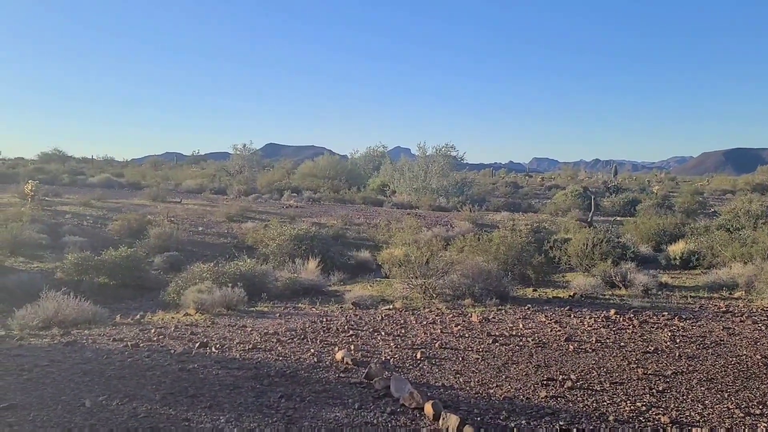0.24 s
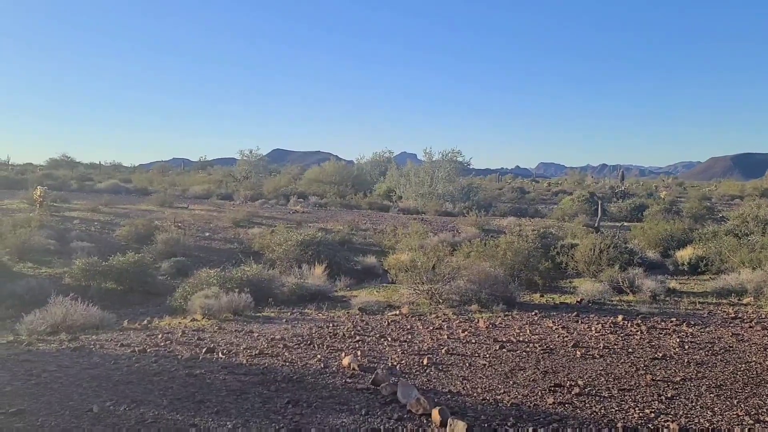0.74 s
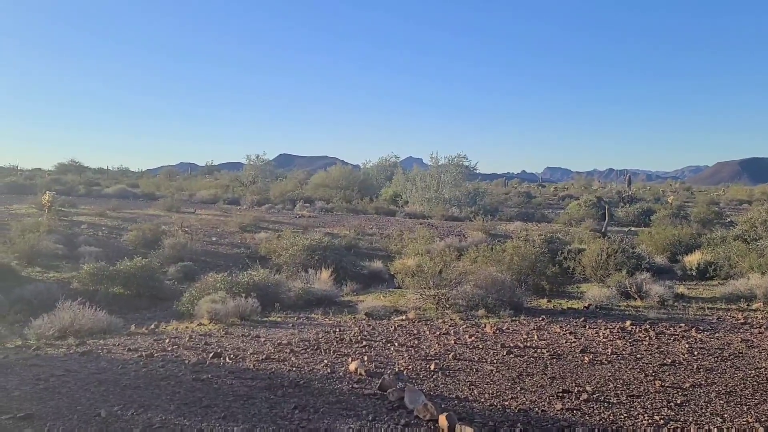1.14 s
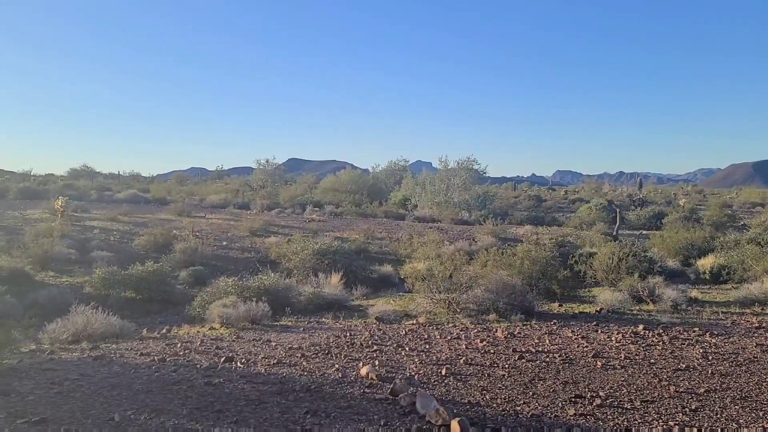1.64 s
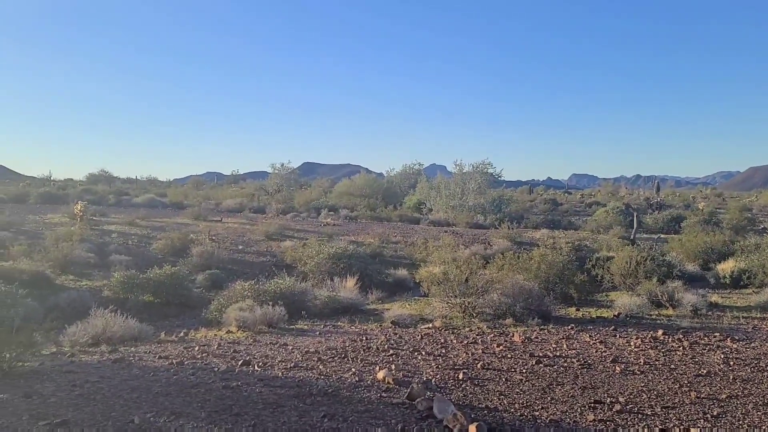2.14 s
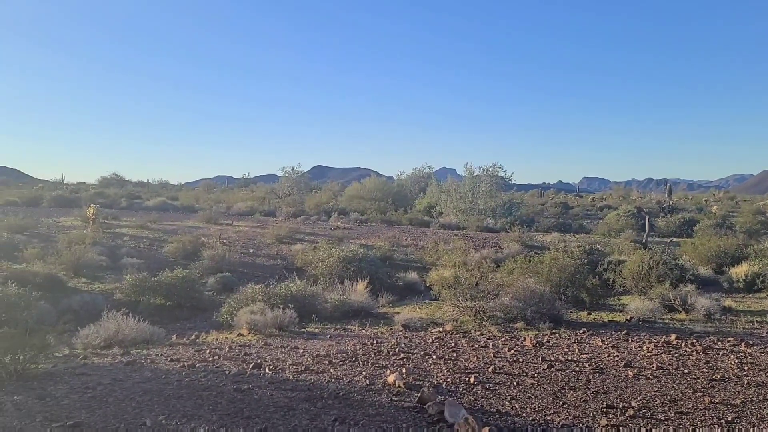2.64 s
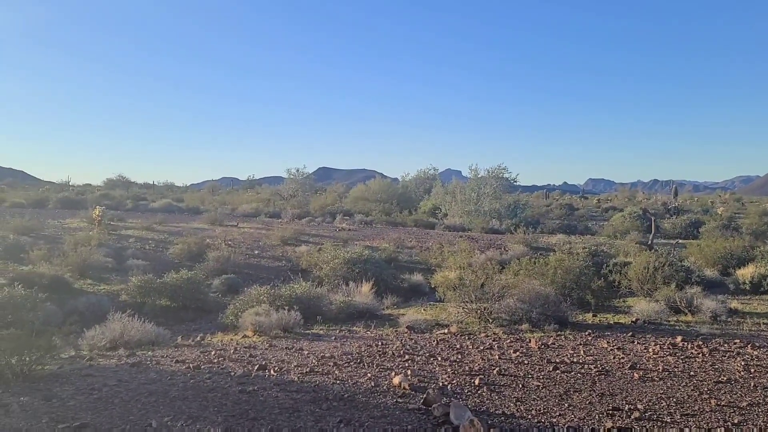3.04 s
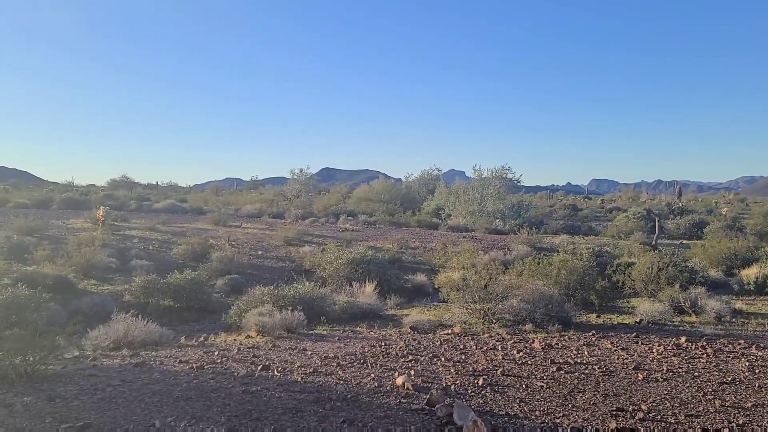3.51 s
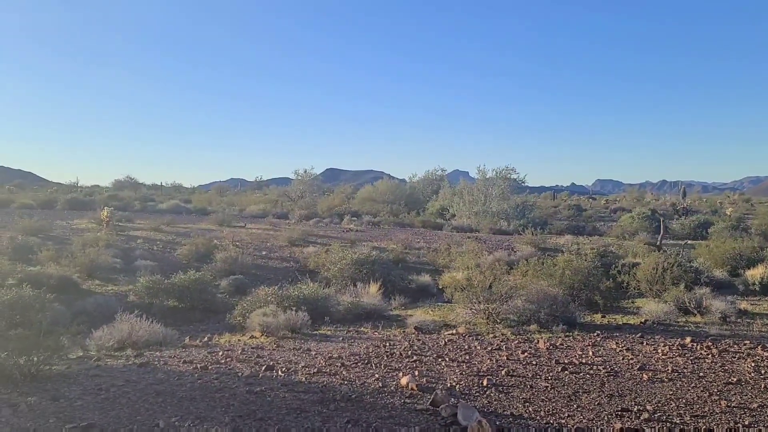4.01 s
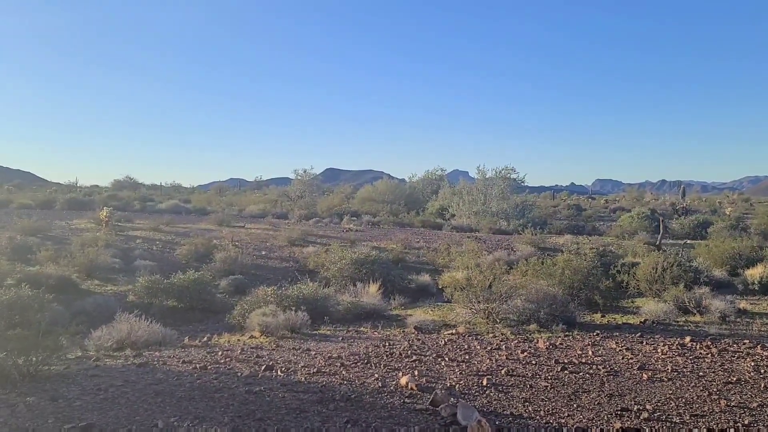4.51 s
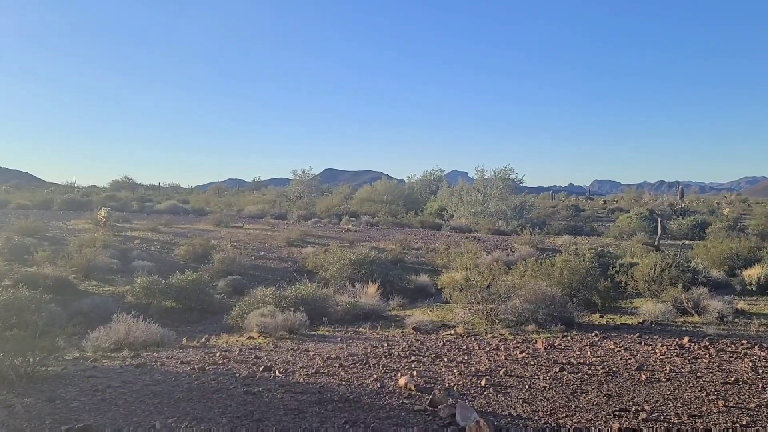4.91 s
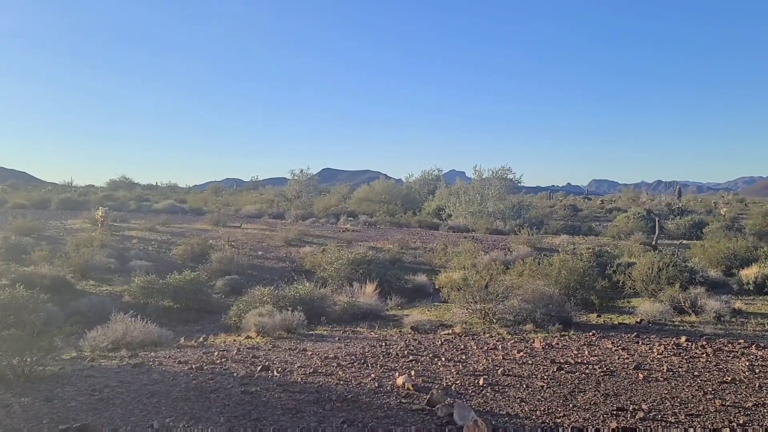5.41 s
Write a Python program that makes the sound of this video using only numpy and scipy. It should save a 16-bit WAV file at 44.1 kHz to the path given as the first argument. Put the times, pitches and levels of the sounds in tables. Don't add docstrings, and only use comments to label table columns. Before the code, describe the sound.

A coyote pack yips, barks, squeals and howls over open desert while light wind rumbles on the microphone and gravel crackles nearby.

```python
import sys
import numpy as np
from scipy import signal
from scipy.fft import rfft, irfft, next_fast_len
from scipy.io import wavfile
from scipy.ndimage import uniform_filter1d

SR = 44100
rng = np.random.default_rng(int(sys.argv[2]) if len(sys.argv) > 2 else 0)


def volts_from_db(level):
    exponent = np.asarray(level, float) / 20
    return 10 ** exponent


def materialize(psi):
    bounded = np.clip(np.atleast_2d(psi).T, -1, 1)
    quanta = np.round(bounded * 32767).astype(np.int16)
    wavfile.write(sys.argv[1], SR, quanta)


N = 249606
TIME = np.arange(N) / SR
SPAN = next_fast_len(N, real=True)
BINS = np.fft.rfftfreq(SPAN, 1 / SR) + 1
OPPOSED = np.array([[1], [-1]])

SHORT_TURNED_DB = [8.4, 3.3, 3, 2, 8, 18]


def shape(points, log=True):
    hz, value = np.transpose(sorted(points))
    if log:
        return np.interp(np.log(BINS), np.log(hz + 1), value)
    return np.interp(BINS, hz, value)


def colour(x, gain):
    return irfft(rfft(x, SPAN) * gain, SPAN)[..., :N]


def unit(x):
    return x / np.sqrt(np.mean(x ** 2))


def walk(rate_hz):
    hold = int(SR / rate_hz)
    held = np.repeat(rng.standard_normal(N // hold + 1), hold)
    return unit(uniform_filter1d(uniform_filter1d(held, hold), hold)[:N])


def ring(x, hz, width_hz):
    b, a = signal.iirpeak(hz, hz / width_hz, fs=SR)
    return signal.lfilter(b, a, signal.lfilter(b, a, x))


def gate(t, start_s, end_s, edge_s=0.0013):
    return np.clip(np.minimum(t - start_s, end_s - t) / edge_s + .5, 0, 1) ** 2


def wind():
    # hz, db_per_hz
    air = [(20, -14), (40, -6), (100, -1.5), (260, -8), (400, -25), (700, -31), (1300, -15), (2200, -16),
           (3300, -26), (4300, -29), (5400, -24.5), (6900, -39.5), (7500, -35), (8300, -50.5),
           (12500, -47.5), (16000, -61)]
    # hz, left_minus_right_db
    balance = [(230, -1), (550, -16.5), (1300, 3.5)]
    # time_s, level_db
    gusts = [(0.0, -57), (0.03, -64), (0.31, -60), (0.41, -63.5), (1.59, -64), (1.69, -59), (1.76, -65),
             (2.59, -64), (2.61, -60.5), (2.81, -65.5), (3.74, -64.5), (3.85, -69), (3.94, -60.5),
             (4.1, -70), (4.35, -58.5), (4.4, -63), (5.63, -63.5), (5.66, -58.5)]
    level_db, usual_gust_db, haze_db = -59, -63.5, 1.2
    gust_db = np.interp(TIME, *np.transpose(gusts)) - usual_gust_db
    tint = volts_from_db(shape(air))
    octave = np.log2(BINS)
    haze = walk(3)
    out = 0
    for centre in np.arange(4.5, 14.5, .5):
        mid, side = rng.standard_normal((2, N))
        apart = np.clip(2 ** centre / 900, .22, .9)
        band = tint * np.cos(np.pi * np.clip(octave - centre, -.5, .5))
        flicker_db = 1.7 * walk(12)
        if centre < 9:
            flicker_db = flicker_db + gust_db + 2.7 * walk(8.1)
        else:
            flicker_db = flicker_db + haze_db * haze
        out = out + volts_from_db(flicker_db) * colour(mid + apart * side * OPPOSED, band)
    left = volts_from_db(shape(balance) / 2)
    return volts_from_db(level_db) * unit(np.array([colour(out[0], left), colour(out[1], 1 / left)]))


def howls():
    # [(time_s, pitch_hz, second_partial_db), ..]
    moaner = [
        (5.2, [(3.2, 605, -58), (3.22, 637, -43), (3.285, 688, -54.5), (3.397, 606.6, -50), (3.437, 636, -48.5), (3.492, 809, -39.5), (3.529, 1016, -48), (3.577, 1076, -46.5), (3.629, 694, -60)]),
        (6.5, [(3.682, 630.7, -45.5), (3.712, 637, -55), (3.821, 604, -55.5), (3.896, 799, -46.5), (3.991, 1085, -51.5), (4.093, 1224, -55), (4.121, 1398, -64), (4.146, 1710, -48.5), (4.205, 1105, -46)]),
        (10.5, [(4.822, 684, -53.5), (4.865, 869.4, -34.5), (4.899, 1077, -39.5), (4.916, 1081, -35.5), (4.934, 1048, -40), (4.948, 860, -44.5), (4.962, 732, -44.5), (4.988, 606, -41.5), (5.04, 619, -50)]),
        (12.05, [(5.025, 620.4, -44), (5.081, 638, -42.5), (5.151, 600.6, -47), (5.221, 719, -40), (5.29, 943, -41), (5.338, 1109, -35.5), (5.378, 1190, -34), (5.4, 1290, -56), (5.51, 1495, -56.5)]),
    ]
    climber = [
        (7.1, [(.182, 703.6, -46), (.2, 794.4, -33.5), (.243, 1130, -26.5), (.268, 1140, -30.5), (.294, 1143, -37), (.327, 1133, -52), (.347, 1317, -63.5), (.378, 1563, -42.5), (.425, 1088, -49)]),
        (8.9, [(1.402, 694, -29), (1.442, 1084, -30.5), (1.484, 991, -32), (1.522, 1194, -48), (1.553, 1290, -24.5), (1.574, 1482, -30.5), (1.584, 1796, -33), (1.6, 1279, -45), (1.629, 1217, -56)]),
        (2.2, [(2.572, 737.5, -44.5), (2.597, 933, -39), (2.624, 1216, -39.5), (2.7, 1282, -56.5), (2.739, 1336, -34.5), (2.774, 1620, -34), (2.846, 1924, -35), (2.878, 1965, -30.5)]),
        (3.7, [(3.352, 762, -38.5), (3.385, 1188, -33), (3.42, 1182, -36.5), (3.445, 1210, -57), (3.472, 1380, -56), (3.495, 1582, -28.5), (3.52, 1537, -52), (3.549, 1162, -42)]),
    ]
    squealer = [
        (1.3, [(0., 1047, -36.5), (.05, 1097, -38.5), (.058, 1373, -43), (.085, 1617, -42.5), (.1, 1630, -51)]),
        (4.7, [(.392, 1067, -39), (.427, 1206, -36.5), (.476, 1593, -39), (.505, 1920, -47), (.524, 1970, -88)]),
        (12, [(.606, 2110, -36), (.616, 2085, -35), (.642, 2055, -39.5), (.658, 2062, -44), (.669, 2040, -53.5), (.677, 1750, -58), (.686, 1477, -50), (.698, 1200, -65)]),
        (3.55, [(1.29, 1388, -49), (1.302, 1481, -38), (1.4, 1438, -42.5), (1.5, 1309, -43.5), (1.58, 1258, -51)]),
        (1.4, [(2.01, 1528, -43), (2.053, 1986, -59.5), (2.088, 1990, -40), (2.133, 1960, -48)]),
        (1.4, [(2.312, 1350, -55), (2.352, 1648, -41), (2.412, 1830, -93), (2.429, 2007, -44), (2.469, 2017, -55), (2.5, 1990, -90)]),
        (1.2, [(3.021, 1165, -54.5), (3.058, 1219, -41), (3.093, 1530, -40.5), (3.128, 1540, -74), (3.148, 1295, -49)]),
        (4.1, [(5.086, 1177, -40.5), (5.108, 1177, -28.5), (5.148, 1083, -45.5), (5.181, 1423, -42), (5.211, 1440, -41), (5.241, 1294, -38), (5.268, 1081, -44.5)]),
    ]
    singer = [
        (-9, [(.975, 620, -66), (1.0, 800, -45), (1.023, 880, -37.5), (1.08, 886, -43.5), (1.127, 885, -43), (1.147, 954, -42.5)]),
        (-0.5, [(1.551, 1192, -47.5), (1.574, 1064, -43.5), (1.646, 1032, -45), (1.684, 1114, -46.5), (1.768, 990, -51.5)]),
        (-5.5, [(1.781, 717, -47), (1.821, 727, -43.5), (1.868, 841.6, -43), (1.916, 809, -44), (1.985, 668, -51), (2.018, 540, -61.5)]),
        (3, [(2.227, 759, -39), (2.272, 735.6, -49), (2.335, 783, -46), (2.4, 917, -33), (2.427, 858, -51.5), (2.449, 731, -59)]),
        (-0.5, [(4.408, 844, -45.5), (4.46, 1033, -36), (4.49, 1159, -49.5), (4.502, 1113, -35.5), (4.515, 1244, -38.5)]),
        (-3, [(3.697, 630, -53.5), (3.724, 707, -39), (3.776, 816, -37.5), (3.811, 784, -43.5), (3.846, 839, -42), (3.874, 980, -31)]),
        (-4, [(4.096, 649, -46.5), (4.168, 779, -34), (4.245, 766, -43.5), (4.273, 859, -33.5), (4.3, 984, -31.5)]),
    ]
    barker = [
        (3.5, [(.828, 530.5, -49.5), (.845, 689, -40.5), (.87, 935, -26.5), (.895, 1065, -27), (.92, 1008, -27.5), (.935, 857, -41), (.95, 763, -52.5)]),
        (4.5, [(3.871, 1005, -25), (3.891, 1213, -35.5), (3.909, 1211, -30.5), (3.936, 1155, -37), (3.954, 971, -39)]),
        (-0.5, [(1.145, 926, -41), (1.165, 992, -52.5), (1.27, 1104, -34.5), (1.298, 1195, -31)]),
        (1.5, [(3.075, 584, -46.5), (3.11, 646, -46.5), (3.135, 593, -47.5), (3.178, 341, -51.5)]),
        (1.5, [(5.475, 302.4, -48.5), (5.52, 385, -37), (5.57, 482, -32), (5.6, 474.7, -36), (5.632, 364, -50.5)]),
        (-6, [(4.68, 240, -70), (4.7, 255, -60), (4.716, 280, -55), (4.73, 294, -49), (4.742, 292, -52), (4.762, 285, -53), (4.785, 265, -52), (4.8, 250, -60)]),
        (-0.8, [(5.02, 665, -42), (5.035, 750, -35), (5.06, 830, -31), (5.08, 865, -32), (5.095, 870, -29), (5.106, 860, -34)]),
    ]
    press = [0.66, 0.61, 0.58, 0.063, 0.093][:5]
    fall_press = [0.38, 0.075, 0.21, .1, 0.092]
    turned = [
        [2.66, 3, 30, 14],
        [1, 0.5, 23, -5],
        [2.5, 9, -0.5, -4.5, -1.5, 3, 4, -12.5],
        [-2, 6, 45.5, 4, -7, 15, 4],
        [-4, 3, -3, 4, -1.5, 12, 7],
    ]
    # start_db, end_db
    mouth = [
        [(1, -1), (-1.5, 2.8), (-9, 13), (3.5, -1.5)],
        [(-4, -0.5), (-3, -4.5), (1.2, -7.5), (-3.3, 3.2)],
        [(0.3, -1.2), (0.3, 1), (0.3, 3.5), (0.3, 0.5), (0.3, 1.5), (0.3, 7), (0.3, -1), (0.3, 1.7)],
        [(-0.8, -1.5), (-1.7, 3.7), (1, 3), (-12, -5), (1.5, -2), (-5.2, 1.8), (-4.3, 0.3)],
        [(-8.5, -11), (-0.8, -0.3), (-0.5, -3.7), (0, -3), (2.8, 3.4), (14, 10), (-5, -3)],
    ]
    usual_db = -37
    animals = (moaner, climber, squealer, singer, barker)
    out = []
    for table, effort, tense, turns, mouths in zip(animals, press, fall_press, turned, mouth):
        for (soft, rows), turned_db, ends_db in zip(table, turns, mouths):
            s, hz, db = np.transpose(rows)
            mouth_db = np.interp(s, s[[0, -1]], ends_db)
            slope = np.diff(np.log2(hz), prepend=0) / np.diff(s, prepend=-1)
            fall = np.maximum(-slope, 0)
            softness = soft - effort * (db - usual_db) - tense * fall
            out.append(np.c_[rows, softness, turned_db + 0 * s, mouth_db])
    return out


def slides():
    # start_s, length_s, first_hz, last_hz, level_db at the highest pitch
    yips = [
        (1.195, .142, 745, 904, -44),
        (1.367, 0.087, 663.6, 1018, -30.5),
        (1.941, .067, 949, 1227, -39),
        (2.839, 0.097, 1031, 1055, -52),
        (2.887, .097, 906, 634, -39),
        (3.327, 0.04, 584, 930, -30),
        (4.369, 0.037, 844, 647, -30),
        (5.46, .095, 712, 1203, -30),
    ]
    whimpers = [
        (1.34, .065, 860, 1130, -41),
        (2.135, .09, 690, 920, -34),
        (3.642, 0.043, 517, 573, -47),
        (4.812, 0.046, 576.5, 892, -41),
        (5.246, .027, 979, 1076, -41.5),
    ]
    strains = [
        (4.51, .117, 1005, 1167, -50.5),
        (4.63, 0.06, 1060, 1082, -55.5),
    ]
    softness = [-0.55, 4, -22.5]
    mouth = [-0.3, -1, -1.5]
    bend, swell_db_per_octave = 0.81, 27.5
    x = np.linspace(0, 1, num=17)
    out = []
    for table, soft, turned_db, mouth_db in zip((yips, whimpers, strains), softness, SHORT_TURNED_DB, mouth):
        for start_s, length_s, first_hz, last_hz, db in table:
            hz = first_hz + (last_hz - first_hz) * x ** bend
            level_db = db + swell_db_per_octave * np.log2(hz / hz.max())
            out.append(np.c_[start_s + length_s * x, hz, level_db, soft + 0 * x, turned_db + 0 * x,
                             mouth_db + 0 * x])
    return out


def arches():
    # start_s, length_s, top_hz, share of pitch lost at the ends, top_db
    yelps = [
        (4.286, 0.086, 1160, 0.18, -34),
    ]
    whines = [
        (4.506, .087, 1650, 0.19, -47),
    ]
    growls = [
        (2.128, .082, 418, .16, -47.5),
    ]
    # softness_db_per_octave, roundness, end_fade_db, share before the top
    arch = [(4, 2.3, -2.5, 0.37), (13.5, 7.8, -3.5, 0.98), (-2.5, 3.2, 12, 0.4)]
    x = np.linspace(0, 1, num=17)
    out = []
    for table, (soft, bend, fade_db, top), turned_db in zip((yelps, whines, growls), arch, SHORT_TURNED_DB[3:]):
        off = np.maximum(1 - x / top, (x - top) / (1 - top))
        for start_s, length_s, top_hz, lost, db in table:
            hz = top_hz * (1 - lost * off ** bend)
            out.append(np.c_[start_s + length_s * x, hz, db - fade_db * off ** 2, soft + 0 * x,
                             turned_db + 0 * x, 0 * x])
    return out


def call(rows, flutter, chaos, shimmer):
    # start_s, end_s, voice_pitch_hz, half_pitch_db, rasp_db
    breaks = [(0.16, 0.267, 1000, -2, 0), (0.252, 0.279, 1140, -1, -18.5), (3.6, 3.64, 800, 4.5, 2.5),
              (0.85, 0.94, 1040, -4, -1), (1.03, 1.078, 880, -4, -30.5), (1.407, 1.473, 1050, -3, -5),
              (2.157, 2.232, 830, -24, -1.5), (2.125, 2.186, 400, -4, -2.5), (2.609, 2.63, 1180, -4, 8.5),
              (3.352, 3.401, 950, -25, -10), (3.365, 3.411, 1180, 6, -6), (4.658, 4.745, 280, -25, -14),
              (4.745, 4.803, 281, -13, -1), (1.584, 1.606, 1450, -9.5, -7), (4.863, 4.893, 960, 4, -12.5),
              (4.893, 4.93, 1070, -7.5, -22), (5.032, 5.117, 830, -3, -2), (5.112, 5.125, 1170, 1.5, -22),
              (5.49, 5.646, 460, -22, -9)]
    slack_rad, rasp_turn_rad, shimmer_db = .7, 1.2, 2.5
    s, *columns = np.transpose(rows)
    span = slice(max(int((s[0] - .02) * SR), 0), int((s[-1] + 0.028) * SR))
    t = TIME[span]
    hz, db, soft, turned_db, mouth_db = (uniform_filter1d(np.interp(t, s, c), size=400) for c in columns)

    half, rasp = 0, 0
    for start_s, end_s, near_hz, half_db, rasp_db in breaks:
        here_hz = np.interp((start_s + end_s) / 2, s, columns[0], 1, 1)
        if abs(np.log(here_hz / near_hz)) < .2:
            half = half + gate(t, start_s, end_s) * volts_from_db(half_db)
            rasp = rasp + gate(t, start_s, end_s, edge_s=1 / 30) * volts_from_db(rasp_db)

    wobble = (0.0095 + .03 * rasp) * flutter[span]
    phase = 2 * np.pi * np.cumsum(hz * (1 + wobble)) / SR
    order = np.arange(1, 1 + int(7000 / hz.min()))[:, None]
    knee = np.clip(3000 / hz, 2, 7.5)
    low_db = -soft * np.log2(np.minimum(order, knee) / 2)
    high_db = -(20.0 + turned_db - 10.6 * rasp) * np.log2(np.maximum(order / knee, 1))
    partials = volts_from_db(low_db + high_db) * (order * hz < 8000)
    partials[0] *= volts_from_db(-1.2 * np.maximum(6 - soft, 0))
    partials[1] *= volts_from_db(mouth_db)

    own = (np.arange(N)[span] + len(t) * order) % N
    lost = rasp * np.clip(order * hz / 1000 - 1, 0, 1)
    scatter = slack_rad * rng.standard_normal(order.shape)
    partials *= np.cos(order * phase + scatter + rasp_turn_rad * lost * chaos[own])
    partials *= volts_from_db(shimmer_db * np.minimum(order / 3, 1) * shimmer[own])
    swing = 1 + half * np.cos(phase / 2)
    fade = gate(t, s[0], s[-1], edge_s=13 / hz.mean())
    out = np.zeros(N)
    out[span] = np.sqrt(2) * volts_from_db(db) * fade * partials.sum(0) * swing
    return out


def pack():
    # hz, level_db
    throat = [(500, -44.5), (800, -17), (1150, -9.5), (1600, -8.5), (2000, -1.5), (2400, 1), (2800, -3),
              (3300, -8.5), (3900, -15), (4600, -22.5),
              (250, -47.5), (5000, -22.5), (5450, -15.5), (5900, -32.5), (6600, -30), (8000, -56)]
    # hz, left_minus_right_db
    left_level = [(800, .5), (1300, 3), (2200, 4), (3200, 3.5), (5000, -1)]
    # hz, left_lead_rad
    left_lead = [(0, 3.1), (1000, 0.84), (2400, 0.53), (3000, 4.18)]
    echo_s, echo_db, echo_spread_s = .135, -18, .012
    brush_db, brush_t60_s, breath_db = -20.5, .55, -26
    flutter, chaos, shimmer, breath = walk(150), walk(420), walk(45), walk(1500)
    folds = sum(call(rows, flutter, chaos, shimmer) for rows in slides() + arches() + howls())
    folds = folds * (1 + volts_from_db(breath_db) * breath)
    voices = colour(folds, volts_from_db(shape(throat)))

    mid, side = rng.standard_normal((2, N))
    brush = volts_from_db(brush_db) * np.exp(-np.log(1000) * TIME / brush_t60_s)
    slope = volts_from_db(echo_db) * np.exp(-((TIME - echo_s) / echo_spread_s) ** 2)
    land = (brush / np.sqrt(SR / 20) + slope / np.sqrt(SR / 10)) * (mid + 1.2 * side * OPPOSED)
    heard = voices + signal.fftconvolve(voices[None], land[:, :SR], axes=1)[:, :N]
    ports = volts_from_db(shape(left_level) / 2) * np.exp(.5j * shape(left_lead, log=False))
    return np.array([colour(heard[0], ports), colour(heard[1], 1 / ports)])


def gravel():
    # start_s, length_s, level_db, treble_db
    steps = [
        (2.14, 0.23, -68.5, 1),
        (2.3, 0.33, -75.5, -0.5),
        (2.624, 0.35, -85, 1),
        (2.799, 0.33, -64, -6),
        (3.052, .44, -62.5, 0),
        (3.318, 0.42, -66, 1),
        (3.75, 0.33, -67, 1),
    ]
    # time_s, peak_db
    snap_events = [(0.001, -43.5), (2.158, -56), (2.486, -56), (2.527, -58), (2.5962, -47), (2.664, -62),
                   (2.767, -66), (2.851, -55), (2.9167, -46), (2.966, -47), (3.2446, -48), (3.2609, -45),
                   (3.266, -46), (3.2807, -44.5), (3.2932, -38), (3.412, -47), (3.426, -47), (3.443, -45),
                   (3.46, -54), (3.4816, -41.5), (3.545, -56), (3.63, -47), (3.711, -62), (3.7308, -46),
                   (3.8267, -49), (3.849, -53), (3.925, -45)]
    # hz, width_hz, level_db
    stones = [(4360, 1600, -5.5), (5190, 910, 0.5), (6100, 190, -10.5), (7380, 170, -8), (8470, 1200, -15),
              (12400, 2100, -21.5)]
    step_round, snap_treble_db, patchy_db = 1.5, 4, 2.5
    weight, treble_gain_db = 0, 0
    for start_s, length_s, db, treble_db in steps:
        swell = np.sin(np.pi * np.clip((TIME - start_s) / length_s, 0, 1)) ** step_round
        weight = weight + volts_from_db(db + 23.5) * swell
        treble_gain_db = treble_gain_db + treble_db * swell
    grains = np.repeat(volts_from_db(2.4 * rng.exponential(size=N // 30 + 1)), 30)[:N]
    hits = unit(uniform_filter1d(grains, size=15)) * weight
    snaps = np.zeros(N)
    for at_s, peak_db in snap_events:
        snaps[int(at_s * SR):][:90] += volts_from_db(peak_db + 19.0) * np.exp(-np.arange(90) / 18)
    own, right = rng.standard_normal((2, N))
    ports = np.array([volts_from_db(-16.5) * (own - 0.41 * right), right])
    dull = (hits + snaps) * ports
    bright = (hits * volts_from_db(treble_gain_db) + snaps * volts_from_db(snap_treble_db)) * ports
    out = 0
    for hz, width_hz, db in stones:
        source = bright if hz > 8000 else dull
        out = out + volts_from_db(db + patchy_db * walk(22)) * ring(source, hz, width_hz)
    return out


def knock():
    # hz, level_db, t60_s
    modes = [(281, -49.5, 0.41), (550, -49.5, 0.19), (3580, -41, 0.096), (5020, -46, 0.2), (9100, -70, 0.1)]
    start_s, attack_s, top_hz = .287, 0.0019, 11100
    age_s = np.maximum(TIME - start_s, 0)
    out = 0
    for hz, db, t60_s in modes:
        scrape = unit(ring(rng.standard_normal(N), hz, 0.32 * hz))
        out = out + volts_from_db(db) * scrape * np.exp(-np.log(1000) * age_s / t60_s)
    out = out * np.clip(age_s / attack_s, 0, 1)
    return colour(out, 1 / (1 + (BINS / top_hz) ** 8)) * volts_from_db(np.array([[-4], [3]]))


def bird():
    # start_s, length_s, first_hz, last_hz, level_db
    chirps = [
        (0.323, .026, 5400, 5600, -52),
        (.4, .014, 5700, 5200, -56.5),
        (0.702, 0.017, 5400, 5400, -67),
        (1.07, .025, 5500, 5600, -68),
    ]
    out = 0
    for start_s, length_s, first_hz, last_hz, db in chirps:
        x = np.clip((TIME - start_s) / length_s, 0, 1)
        phase = 2 * np.pi * np.cumsum(first_hz + (last_hz - first_hz) * x) / SR
        out = out + volts_from_db(db) * np.sin(np.pi * x) * np.sin(phase)
    return out * np.ones((2, 1))


def scene():
    return wind() + pack() + gravel() + knock() + bird()


def low_pass(x):
    return signal.sosfilt(signal.butter(12, 15720, fs=SR, output="sos"), x)


def record(dry):
    return low_pass(dry)


dry = scene()
out = record(dry)
materialize(out)
```